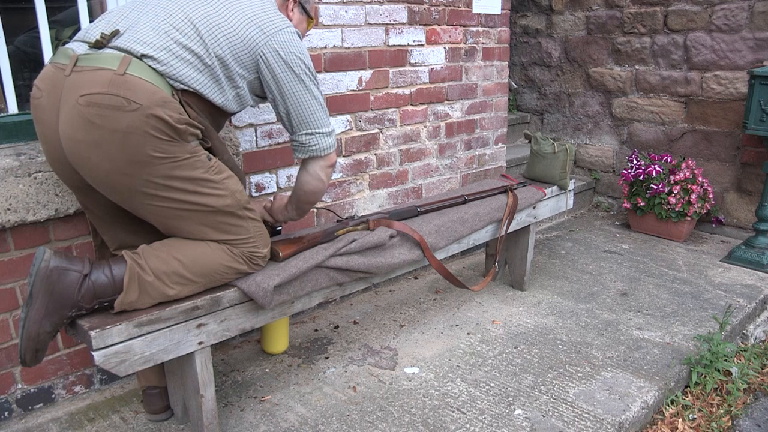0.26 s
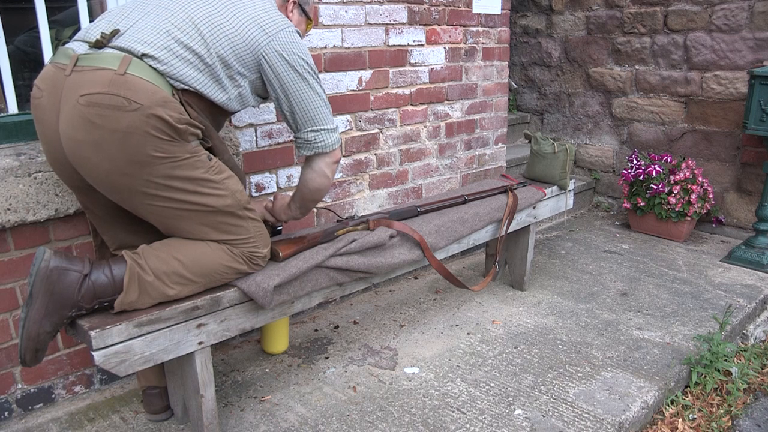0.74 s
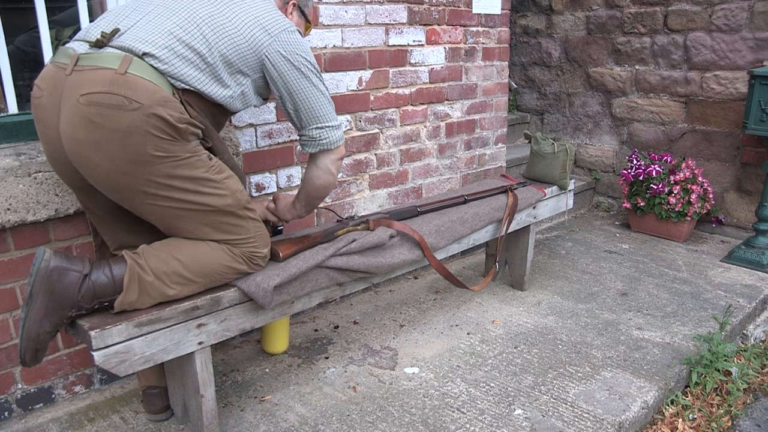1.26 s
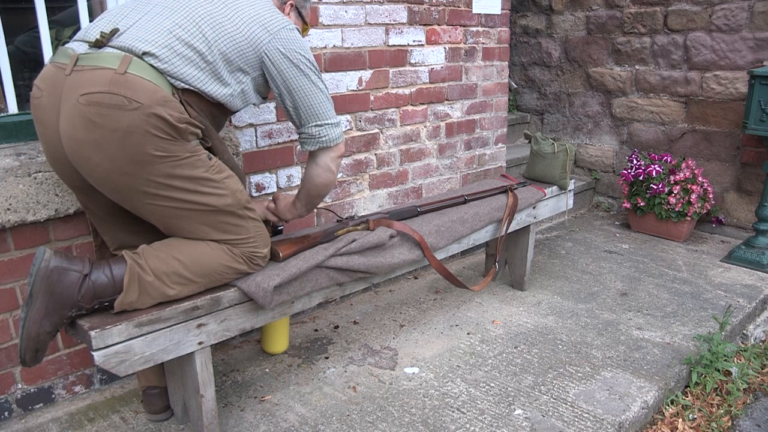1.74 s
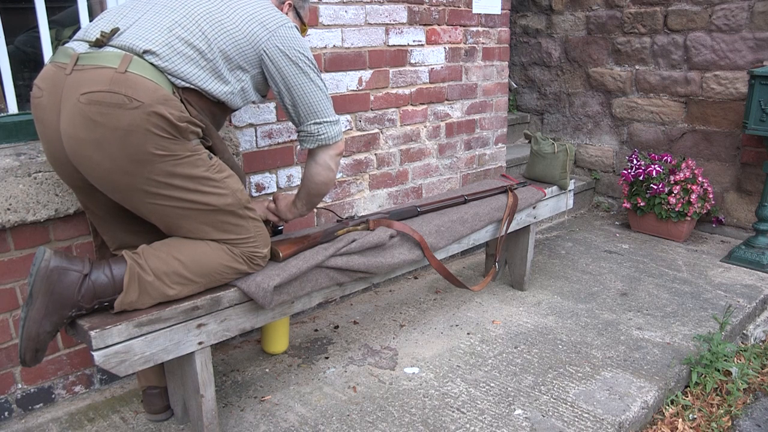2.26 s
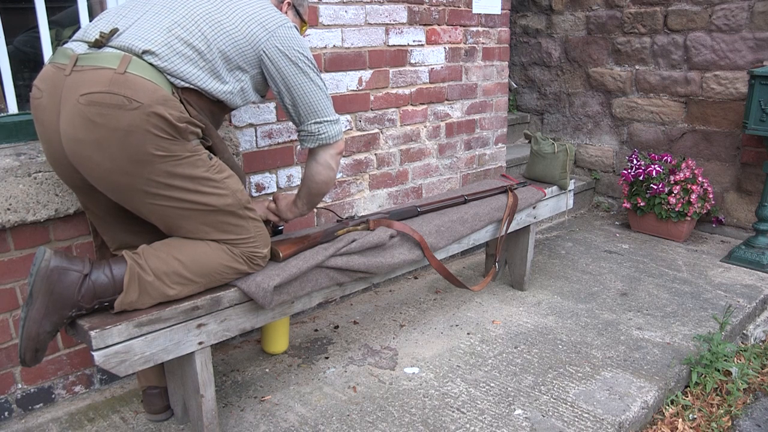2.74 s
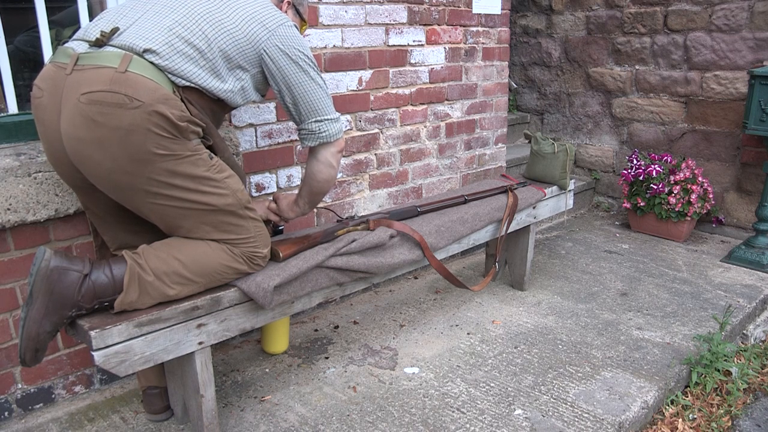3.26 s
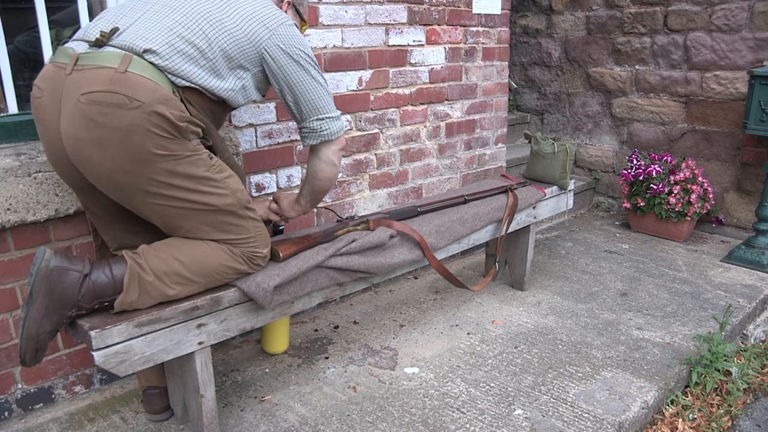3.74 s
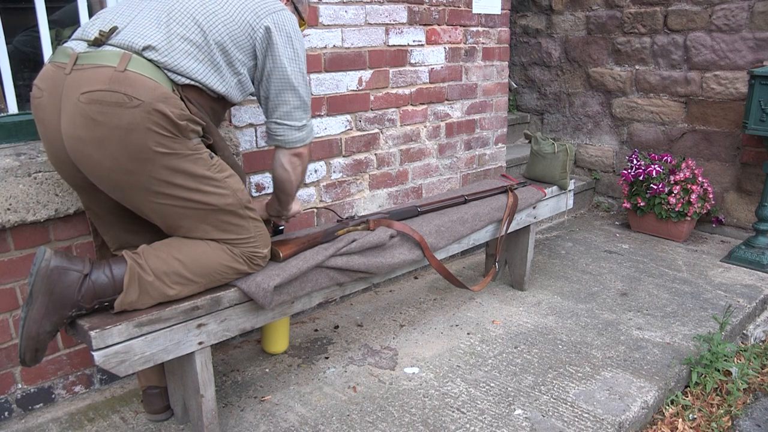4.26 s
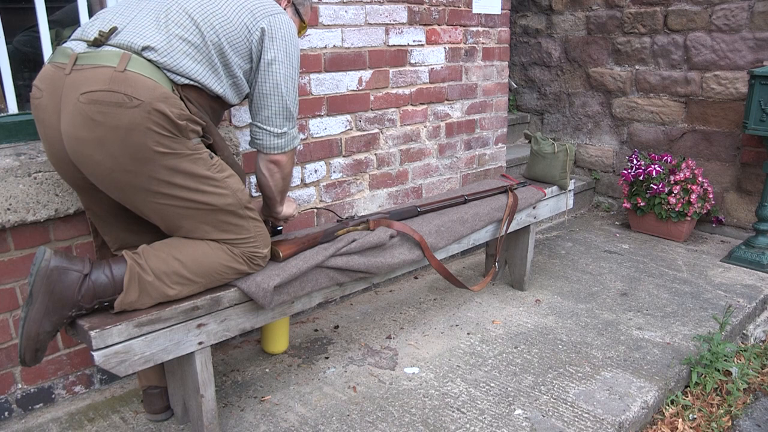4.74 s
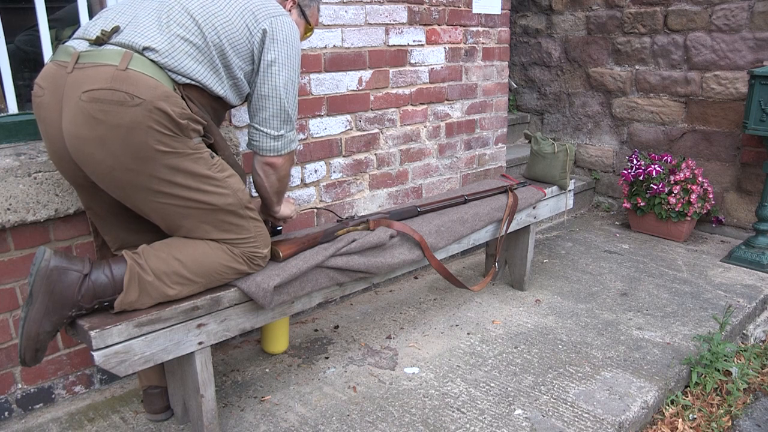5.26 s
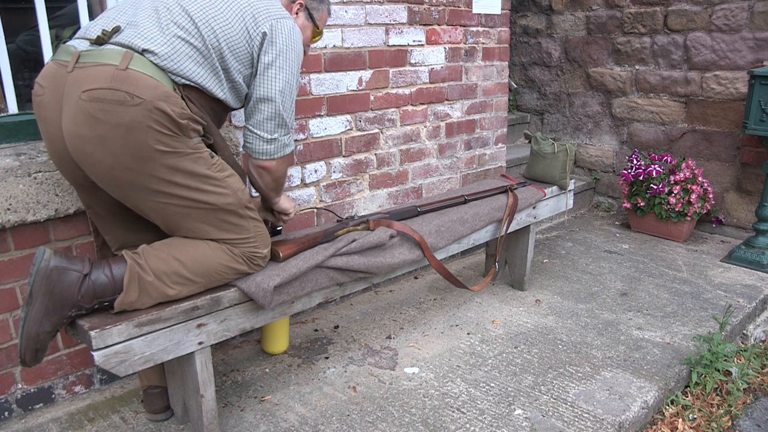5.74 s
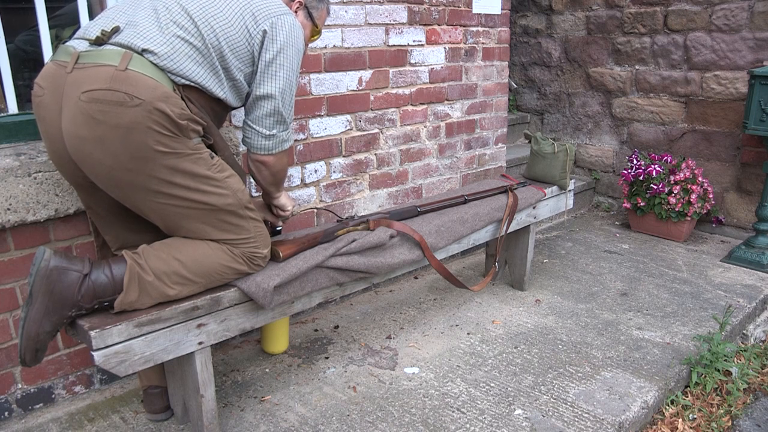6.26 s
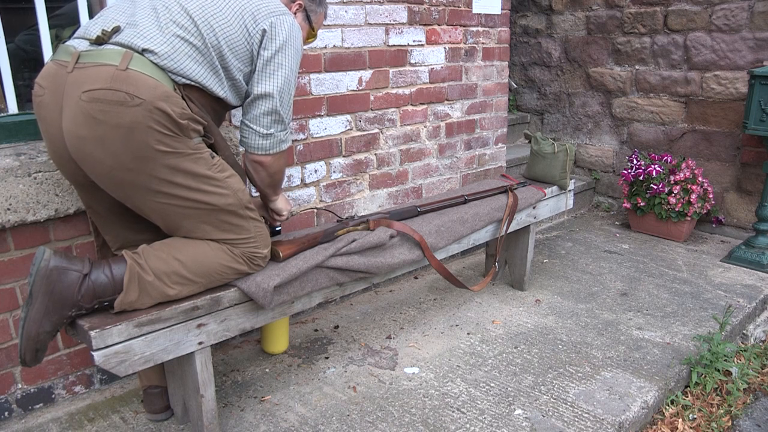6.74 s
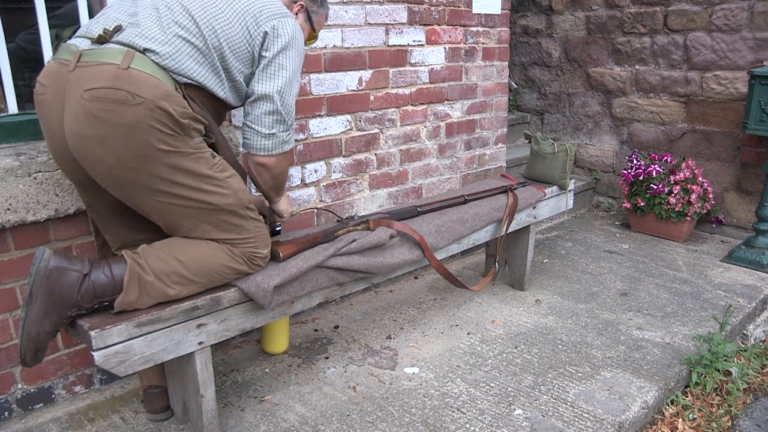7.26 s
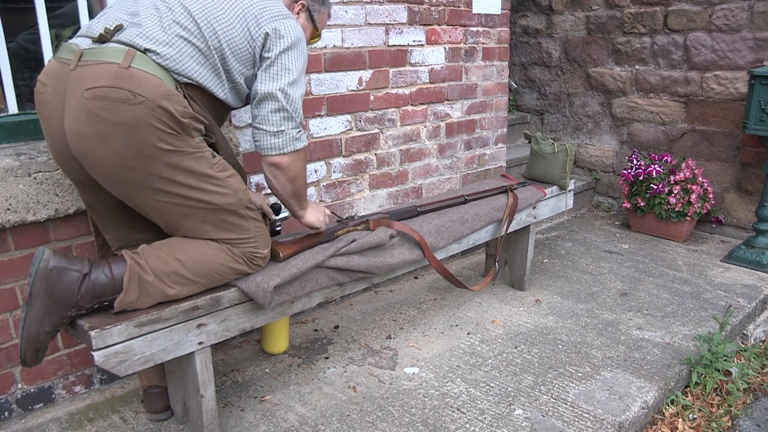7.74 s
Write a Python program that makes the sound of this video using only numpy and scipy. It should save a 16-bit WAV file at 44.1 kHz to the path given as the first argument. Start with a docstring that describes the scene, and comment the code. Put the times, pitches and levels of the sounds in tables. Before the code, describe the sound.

A quiet outdoor yard: soft far traffic drone, low engines fading away, and faint short bird chirps during the first 1.3 s. A small dry click comes at 0.75 s. From about 1.2 s a very thin air hiss appears with barely audible whistles, swelling by 2 s, with a soft low puff near 1.6 s. At 2.45-2.8 s it spits in quick spurts, with very sharp metallic clicks and a brief falling whistle. The hiss holds modestly, with light knocks at 3.3 and 3.5 s. At 3.6 s a click and high chirp-like whistle make it jump; a ringing clack at 3.83 s opens it wider, loudest and brightest around 4.1 s with a low roar beneath. After 4.5 s it drains steadily, a broad peak sliding downward around 6 s, fading to a faint hiss by 8 s as distant engines hum. Close, lightly reflective stereo.

```python
"""Compressed air hisses from a brass fitting on a wooden bench by a brick wall: shaped noise with a moving peak.
The hiss jumps and whistles (gliding tones) as a hand turns the fitting, then fades as the pressure drains.
Metal parts click: sharp noise blows that ring a set of decaying modes.
A bird chirps in short glides, engines pass in the distance as low wavering tones,
and far traffic drones and rushes as filtered noise."""
import sys
import numpy as np
from scipy import signal
from scipy.fft import rfft, irfft, next_fast_len
from scipy.io import wavfile
from scipy.ndimage import uniform_filter1d, map_coordinates

SR = 44100
rng = np.random.default_rng(int(sys.argv[2]) if len(sys.argv) > 2 else 0)


def generate_wav(sig):
    """Save sig (samples, or channels by samples) to the path in sys.argv[1] as 16-bit PCM at SR."""
    pcm = np.round(np.clip(np.atleast_2d(sig).T, -1, 1) * 32767).astype(np.int16)
    wavfile.write(sys.argv[1], SR, pcm)


N = 352359


def amp(db):
    """Decibels to linear gain."""
    return 10 ** (np.asarray(db) / 20)


def unit(x):
    """Scale to rms 1."""
    return x / np.sqrt(np.mean(x ** 2) + 1e-20)


def along(points, hz):
    """Read a curve of (Hz, value) points on a log frequency axis."""
    f, v = np.transpose(points)
    return np.interp(np.log(hz + 1), np.log(f + 1), v)


def curves(rows):
    """One value per sample for each column after the time."""
    s, *cols = np.transpose(rows)
    return [np.interp(np.arange(N) / SR, s, c) for c in cols]


def wobble(rate, count=N):
    """A smooth random curve with `rate` knots a second."""
    knots = rng.standard_normal(int(count * rate / SR) + 4)
    return map_coordinates(knots, [np.arange(count) * rate / SR])


def filtered(x, response):
    """Multiply the spectrum of x by a complex response of frequency."""
    m = next_fast_len(N + 8192)
    return irfft(rfft(x, m) * response(np.fft.rfftfreq(m, 1 / SR)), m)[..., :N]


def rush(spectrum, alike, patchy_db):
    """Stereo noise of rms 1: random patches in time and pitch, a set colour and left-right likeness."""
    z = signal.stft(rng.standard_normal((2, N)), nperseg=512)[2]
    field = uniform_filter1d(rng.standard_normal(z.shape[1:]), size=5, axis=0)  # over frequency
    field = uniform_filter1d(field, size=20, axis=1)  # over time
    pair = signal.istft(z * amp(patchy_db * unit(field)), nperseg=512)[1][:, :N]
    bounded = [(8.9, -120)] + spectrum + [(21000, -120)]

    def mid_side(hz):
        turn = np.arccos(np.clip(along(alike, hz), -1, 1)) / 2  # share of side that gives the likeness
        return amp(along(bounded, hz)) * [np.cos(turn), np.sin(turn)]

    mid, side = filtered(pair, mid_side)
    return unit(np.array([mid + side, mid - side]))


def scatter(t60, start, count):
    """Dense decaying echoes of energy 1 that swell in over `start` seconds."""
    t = np.arange(SR // 4) / SR
    tail = rng.standard_normal((count, len(t))) * amp(-60 * t / t60) * np.clip(t / start, 0, 1)
    return tail / np.linalg.norm(tail, axis=1, keepdims=True)


def glides(rows, waver, flutter_db, rate, overtone_db, edge_s, fade_db):
    """Short gliding tones, unsteady in pitch and level, soft-edged, with an octave stronger on high tones."""
    out = np.zeros(N)
    for s, length, from_hz, to_hz, bend, db in rows:
        i = np.arange(round(s * SR), round((s + length) * SR))
        left = np.linspace(1, 0, len(i))  # share of the tone still to come
        pitch = to_hz + (from_hz - to_hz) * left ** bend
        pitch = pitch * (1 + waver * wobble(rate, count=len(i)))
        phase = 2 * np.pi * np.cumsum(pitch) / SR
        level = amp(db + fade_db * (left - 1.0) + flutter_db * wobble(rate, count=len(i)))
        level = level * signal.windows.tukey(len(i), min(2 * edge_s / length, 1))
        octave = amp(overtone_db + 20 * np.log10(pitch / 7500)) * (pitch < SR / 4)  # none past Nyquist
        out[i] += np.sqrt(2) * level * (np.sin(phase) + octave * np.sin(2 * phase))
    return out


# Steady flow through the gap. Each row: time in seconds, fizz in dB, upper body in dB over the fizz,
# lower body in dB over the fizz.
FLOW = [(.9, -100, 12, 7), (1.17, -82, 8, 4), (1.22, -61.5, -2.5, -6), (1.54, -52, -4, -7.5),
        (1.6, -48.5, -5.5, -7), (1.93, -41.5, -5.5, -8), (2.44, -39.5, -5, -9), (3, -40.5, -5.5, -6),
        (3.595, -34, -5.5, -4.5), (3.605, -30.5, -4, -8.5), (3.82, -30, -3.5, -7.5),
        (3.84, -26, -4.5, -10.5), (4.04, -26, -5, -10), (4.115, -23.5, -6, -9.5), (4.45, -29.5, -6.5, -9.5),
        (5.4, -38.5, -6, -11), (6, -42, -6, -12.5), (6.7, -47, -4, -14.5), (7.99, -56, -6, -11)]
# Colours of the jet's fine fizz, upper body and lower body, and of its low roar.
# Each row: frequency in Hz, relative density in dB per Hz.
FIZZ_COLOUR = [(6500, -40), (8600, -6), (9800, -1), (10500, -3), (12500, -4), (13200, -8), (13700, -1),
               (14300, 1), (14900, -1), (15300, 0), (16500, -1)]
UPPER_COLOUR = [(2600, 0.5), (3800, -2.5), (5000, 0.5), (7800, -2.5), (9500, -37)]
LOWER_COLOUR = [(700, -4.5), (1200, -4.5), (2300, 1), (3300, -1.5), (4600, -10.5)]
ROAR_COLOUR = [(60, -40), (110, -12), (170, -5.5), (250, 1.5), (330, 0), (400, -4), (470, 0.5), (650, -7),
               (950, -12.5), (1500, -64)]
# Colour of the way from bench to microphone. Each row: frequency in Hz, gain in dB.
BENCH_TO_MIC = [(1000, -5), (1550, 0.5), (1900, -6.5), (2300, -2.5), (2800, -4.5), (3900, 0.5), (4900, 5.5),
                (5600, 3), (7200, 5.5), (8100, 3), (8800, -2.5)]
# Stereo width of hiss and roar. Each row: frequency in Hz, left-right likeness (1 = identical).
HISS_ALIKE = [(60, .94), (160, .85), (450, .82), (740, 0.87), (1220, .86), (2200, 0.99), (3300, 0.99),
              (5000, 0.79), (9000, 0.82), (15000, 0.74)]
ROAR_ALIKE = [(100, 0.97), (300, 0.96), (800, .85)]
# The roar swells while the gap stands wide.
# Each row: start in seconds, extra level in dB, rise in seconds, hold in seconds, fall in seconds.
WIDE_GAP = [(1.552, 19, 0.12, 0.07, 0.23), (3.82, 9.5, .06, 1.16, 0.61)]
ROAR_DB = -27  # low roar over fizz, before the swells
SPURT_UPPER_DB, SPURT_LOWER_DB = -8.5, -13  # bodies of a spurt over its fizz


def leak():
    """Turbulent jet: fine eddies fizz, larger ones give body and a low roar."""
    fizz_db, upper_db, lower_db = curves(FLOW)
    spurt = spurts()

    def level(steady_db, spurt_db):
        """Steady flow and spurts add as power."""
        return np.sqrt(amp(2 * (fizz_db + steady_db)) + amp(2 * spurt_db) * spurt)

    def part(spectrum):
        noise = rush(spectrum, HISS_ALIKE, patchy_db=0.73)
        return unit(filtered(noise, lambda hz: amp(along(BENCH_TO_MIC, hz))))

    jet = level(0, 0) * part(FIZZ_COLOUR)
    jet = jet + level(upper_db, SPURT_UPPER_DB) * part(UPPER_COLOUR)
    jet = jet + level(lower_db, SPURT_LOWER_DB) * part(LOWER_COLOUR)
    hz, t, z = signal.stft(jet, SR, nperseg=512)
    jet = signal.istft(z * jet_peak(hz, t), SR, nperseg=512)[1][:, :N]

    wide_db = sum(np.interp(np.arange(N) / SR, np.cumsum([s, rise, hold, fall]), [0, db, db, 0])
                  for s, db, rise, hold, fall in WIDE_GAP)
    roar = level(0, 0) * amp(ROAR_DB + wide_db) * rush(ROAR_COLOUR, ROAR_ALIKE, patchy_db=0.0)
    hiss = amp(0.25 * wobble(25)) * jet + roar
    return ridged(hiss, still_db=-15.5, hand_db=-10)


# Spurts as the fitting slips in the hand.
# Each row: start in seconds, fizz in dB, rise in seconds, hold in seconds.
SLIPS = [(2.456, -30.5, 0.03, .005), (2.535, -33, .03, 0.038), (2.672, -26.5, .003, .002)]
SPURT_FALL_DB_PER_S = 132


def spurts():
    """Power of the spurts: each rises, holds, then falls at a steady rate in dB."""
    t = np.arange(N) / SR
    power = np.zeros(N)
    for s, db, rise, hold in SLIPS:
        falling_s = np.maximum(t - s - rise - hold, 0)
        power += (np.clip((t - s) / rise, 0, 1) * amp(db - SPURT_FALL_DB_PER_S * falling_s)) ** 2
    return power


# A broad peak (or slight dip) in the jet noise sits where the grip puts it.
# Each row: start in seconds, centre in Hz, width in Hz, boost in dB.
PEAK_STAYS = [(0, 4250, 900, 2.5), (2.45, 12200, 1100, 3), (3.6, 6200, 1300, -0.6), (4.4, 9000, 800, 2.5)]
# Then it slides down an S-shaped path as the pressure drains.
SLIDE_FROM_S, SLIDE_MIDDLE_S, SLIDE_PACE_S = 5.2, 6.17, 0.3
SLIDE_TOP_HZ, SLIDE_END_HZ, SLIDE_WIDTH_HZ, SLIDE_DB = 16600, 3600, 510, 3.9


def jet_peak(hz, t):
    """Gain of the jet's broad peak over frequency and time: stepped by the grip, then sliding down."""
    s, *cols = np.transpose(PEAK_STAYS)
    row = np.searchsorted(s, t, side="right") - 1
    centre_hz, width_hz, boost_db = (c[row] for c in cols)
    fall = 1 / (1 + np.exp((t - SLIDE_MIDDLE_S) / SLIDE_PACE_S))
    slide_hz = SLIDE_END_HZ + (SLIDE_TOP_HZ - SLIDE_END_HZ) * fall
    late = t > SLIDE_FROM_S
    centre_hz = np.where(late, slide_hz, centre_hz)
    width_hz = np.where(late, SLIDE_WIDTH_HZ, width_hz)
    boost_db = np.where(late, SLIDE_DB, boost_db)
    return amp(boost_db * np.exp(-.5 * ((hz[:, None] - centre_hz) / width_hz) ** 2))


# The hand shifts on the fitting. Each entry: start of a grip in seconds.
GRIP_STARTS = [0, 2.45, 3.6, 4.4, 5.6, 6.8]


def ridged(x, still_db, hand_db):
    """Bench and wall scatter sound in a fixed way, the hand anew with each grip: fine ridges in the colour."""
    still = amp(still_db) * scatter(0.076, 0.001, count=1)
    hand = amp(hand_db) * scatter(0.045, 0.0018, count=len(GRIP_STARTS))
    grip = np.searchsorted(GRIP_STARTS, np.arange(N) / SR, side="right") - 1
    out = x + signal.fftconvolve(x, still, axes=1)[:, :N]
    for k, tail in enumerate(hand):
        share = uniform_filter1d((grip == k) * 1., size=4000)  # crossfade from grip to grip
        held = x * np.sqrt(np.abs(share))
        out = out + signal.oaconvolve(held, tail[None], axes=1)[:, :N]
    return out / np.sqrt(1 + amp(2 * still_db) + amp(2 * hand_db))  # keep the power


# Whistles of the narrowed gap; the row at 2.772 is the faint ringing-on of the one before.
# Each row: start in seconds, length in seconds, first pitch in Hz, last pitch in Hz,
# bend (1 = straight), level in dB before flutter.
GAP_TONES = [(1.243, .036, 9600, 9600, 1, -61), (1.235, .1, 2930, 2930, 1, -67),
             (1.37, .1, 2945, 2930, 1, -62.5), (2.526, 0.048, 4920, 4270, 2, -39.5),
             (2.722, 0.049, 8860, 7450, 2.05, -27), (2.772, .06, 7570, 7700, 1, -57),
             (3.598, .024, 10000, 10200, 1, -25), (3.603, .047, 10900, 12050, 1.2, -27.5),
             (3.96, .03, 11750, 11550, 1, -32), (4.128, 0.046, 7000, 6000, 1.5, -33),
             (4.21, 0.053, 1553, 1555, 1.1, -34.5), (4.45, .065, 8350, 8600, .6, -44),
             (4.51, 0.11, 9000, 9300, 1, -38)]


def whistles():
    """The narrowed gap sings in short, unsteady tones, one of them ringing on faintly."""
    return glides(GAP_TONES, waver=.014, flutter_db=3.5, rate=600, overtone_db=-8, edge_s=.012, fade_db=0)


# Contacts of hand, fitting and bench. Each row: time in seconds, level in dB, centre of the blow in Hz,
# breadth in octaves, rattle t60 in seconds.
CONTACTS = [(0.742, -35.5, 5000, 1.1, 0.0046), (.745, -37, 7000, 1.5, .008), (.7555, -52, 9000, 1.0, .006),
            (1.5648, -41, 1700, .2, .008), (1.5655, -43, 880, .15, .006), (1.575, -52, 850, .2, .006),
            (1.595, -46, 3550, 1.2, .022), (2.459, -28.5, 3500, 1.1, .02), (2.676, -12, 5030, 0.7, .004),
            (2.6773, -6, 11000, .53, .006), (2.717, -20.5, 3500, 1.1, .015), (2.719, -27, 600, 0.8, .015),
            (2.7533, -17, 4400, .6, 0.017), (2.783, -42, 700, .44, .018), (3.315, -34, 2500, 1.1, .023),
            (3.502, -22, 1700, 1.5, 0.016), (3.513, -26.5, 2000, 1.2, 0.027), (3.517, -26, 2220, .5, .03),
            (3.527, -33.5, 1900, 0.66, .027), (3.5977, -14, 3370, 0.37, 0.015),
            (3.6007, -19.5, 3020, 0.24, .032), (3.611, -29, 2770, .42, .023),
            (3.8278, -13, 3500, 0.53, .045), (3.832, -16, 3600, .55, 0.049), (3.843, -25, 2560, .3, .048)]
# Ring of fitting and bench. Each row: mode in Hz, relative level in dB, t60 in seconds.
MODES = [(400, -5, .025), (560, -3, .025), (700, -5, .025), (870, 0, .035), (1550, -2, .025),
         (1850, 0, .03), (2300, -1, .025), (2650, 0, .025), (3000, 0, .025), (3350, -2, .02),
         (3800, -4, .02), (4500, -5, .018), (5000, -8, .015), (9800, -8, .018)]
RING_DB, RING_DB_PER_OCTAVE = -6, -6  # ring line through 1 kHz; brighter blows ring less
RING_KNEE_HZ = 1500  # duller blows ring no more than here


def clicks():
    """Each contact is a sharp blow and a dying rattle, shaking the modes near its centre."""
    out, t = np.zeros(N + SR), np.arange(SR // 8) / SR
    hz, level, t60 = np.transpose(MODES)[:, :, None]
    grid = np.fft.rfftfreq(len(t), 1 / SR) + 1
    lead = 40  # samples of room before the blow for its filter to swell
    for s, db, centre_hz, octaves, rattle in CONTACTS:
        ring_db = RING_DB + RING_DB_PER_OCTAVE * np.log2(max(centre_hz, RING_KNEE_HZ) / 1000)
        near = lambda f: np.exp(-.5 * (np.log2(f / centre_hz) / octaves) ** 2)
        mode_level = amp(level + rng.normal(0, 1.0, hz.shape) - 60 * t / t60)
        ring = np.sum(near(hz) * mode_level * np.sin(2 * np.pi * hz * t), axis=0)
        shake = 0.15 * rng.standard_normal(len(t)) * amp(-60 * t / rattle)
        shake[0] = 1  # the blow itself
        shake = np.roll(shake, lead)
        crack = irfft(rfft(shake) * near(grid), len(t)) / np.mean(near(grid))
        rung = amp(ring_db) * np.convolve(shake, ring)[:len(t)]
        out[round(s * SR) - lead:][:len(t)] += amp(db) * (crack + rung)
    return filtered(out[:N], lambda f: (1j * f / (150 + 1j * f)) ** 2)  # small parts push no bass


# Bench, wall and ground answer.
# Each row: delay in seconds, left in dB, right in dB, both before the early_db trim.
REFLECTIONS = [(.0016, -12, -11), (.0025, -15, -18), (.0035, -23, -25), (.0058, -36, -32),
               (.0093, -10, -24), (.014, -16, -9)]


def nearby_walls(x, early_db, tail_db):
    """Direct sound plus early reflections, and a short scattered tail."""
    delay, left, right = np.transpose(REFLECTIONS)
    gains = amp(np.array([left, right]) + early_db)
    early = filtered(x, lambda hz: 1 + gains @ np.exp(-2j * np.pi * np.outer(delay, hz)))
    tail = signal.fftconvolve(x[None], scatter(0.23, 0.0059, count=2), axes=1)[:, :N]
    return early + amp(tail_db) * tail


# Chirps. Each row: start in seconds, length in seconds, first pitch in Hz, last pitch in Hz,
# bend (1 = straight), level in dB before fade and flutter.
CHIRPS = [(.083, 0.021, 2850, 4050, 1.3, -61), (.149, .022, 3400, 4900, 1, -65),
          (.42, 0.057, 3050, 4460, 0.84, -65.5), (.74, 0.17, 4740, 3150, 1.75, -64),
          (.908, .048, 3240, 3100, 1, -72), (.976, .028, 2800, 2550, 1, -69),
          (1.08, .021, 3200, 5200, .8, -67), (1.229, .026, 3500, 4800, 1.3, -59),
          (1.259, 0.02, 4200, 5100, 1, -61)]


def bird():
    """Short, nearly pure gliding chirps that weaken towards their ends."""
    return glides(CHIRPS, waver=.007, flutter_db=3, rate=300, overtone_db=-40, edge_s=.005, fade_db=4)


# Passing engines. Each list holds one engine's tones, except the second: a higher tone of the first engine. #
# Each row: time in seconds, firing tone in Hz, its level in dB, # rough level in dB at twice the tone, rough
# level in dB at three times the tone.
PASSING_ENGINES = [
    [(0, 77.1, -60, -75, -58), (.3, 67, -63, -75, -59.5), (.8, 58.9, -63, -79, -77),
     (1.3, 51.8, -68, -75, -80), (1.8, 45, -77, -70, -84)],
    [(0, 104.2, -53, -69, -82), (.4, 98.8, -58, -72, -80), (.8, 99, -76, -77, -78)],
    [(4.75, 53.4, -78, -78, -80), (5.0, 59, -56, -70, -73), (5.6, 58.3, -53.5, -70, -75),
     (6.0, 58.8, -57.5, -63, -75), (6.25, 62.5, -52.5, -78, -85), (6.6, 70.3, -59.5, -62.5, -77),
     (7.1, 70.5, -54.5, -63.5, -69), (7.4, 70.6, -64, -55.5, -59), (7.55, 71.7, -59, -65, -71),
     (7.7, 83, -62, -74, -74), (7.99, 83.6, -61, -72, -61)],
]


def engines():
    """Low firing tones of distant engines with rough multiples, wavering in the air."""
    out = np.zeros(N)
    t = np.arange(N) / SR
    for rows in PASSING_ENGINES:
        hz, *levels_db = curves(rows)
        fade_in = np.clip((t - rows[0][0] + 0.092) / .1, 0, 1)
        fade_out = np.clip((rows[-1][0] + .1 - t) / .1, 0, 1)
        phase = 2 * np.pi * np.cumsum(hz * (1 + 0.0084 * wobble(7.1))) / SR
        for multiple, db in enumerate(levels_db, start=1):
            level = np.sqrt(2) * amp(db + 0.62 * wobble(9.3))
            out += fade_in * fade_out * level * np.sin(multiple * phase)
    return out


# Far traffic. Each row: time in seconds, drone in dB, tyre rush in dB.
TRAFFIC_LEVELS = [(0, -50, -56), (.55, -55.5, -58), (1.5, -58, -58.5), (2.5, -57, -56), (3.8, -60.5, -55.5),
                  (4.5, -54.5, -63), (5.8, -59, -57), (6.7, -57, -57), (7.99, -55, -54.5)]
# Tyres of the nearest car. Each row: time in seconds, level in dB.
NEAR_CAR_LEVELS = [(0, -58), (.3, -60.5), (.6, -62.5), (.9, -67), (1.3, -75), (7, -88), (7.99, -78)]
# Colours of drone, far tyres and near tyres. Each row: frequency in Hz, relative density in dB per Hz.
DRONE_COLOUR = [(20, -28), (45, -5.5), (100, -0.5), (140, -5), (210, -2.5), (320, -7.5), (500, -26)]
RUSH_COLOUR = [(150, -40), (260, -18.5), (380, -5), (550, -5.5), (800, -6), (1150, -11.5), (1600, -13),
               (2200, -17), (3500, -21), (6000, -29), (10000, -32.5), (16000, -37)]
TYRE_COLOUR = [(500, -30), (850, -6), (1150, 6), (1450, -3), (2200, -28)]
# Stereo width of the traffic. Each row: frequency in Hz, left-right likeness (1 = identical).
FAR_ALIKE = [(60, 0.94), (130, 0.86), (290, 0.59), (640, 0.43), (1410, 0.24), (3100, 0.093), (6820, 0.02),
             (15000, 0.04)]


def traffic():
    """Filtered noise: a low drone, the rush of far tyres and the brighter tyres of the nearest car."""
    drone_db, rush_db = curves(TRAFFIC_LEVELS)
    drone = amp(drone_db + .7 * wobble(5)) * rush(DRONE_COLOUR, FAR_ALIKE, patchy_db=1.5)
    car = amp(curves(NEAR_CAR_LEVELS)[0]) * rush(TYRE_COLOUR, FAR_ALIKE, patchy_db=1.0)
    far_tyres = amp(rush_db) * rush(RUSH_COLOUR, FAR_ALIKE, patchy_db=1.16)
    return drone + car + far_tyres


def scene():
    """Bench in front, bird off to the right, traffic and engines behind; [left, right] trims in dB."""
    bench = leak() + nearby_walls(whistles() + clicks(), early_db=-2.5, tail_db=-8.0)
    far_bird = nearby_walls(bird(), early_db=-4, tail_db=-6)
    far_bird[0] = np.roll(far_bird[0], 2)  # reaches the left two samples later
    low = (engines() + traffic()) * amp([[-.6], [.6]])
    return bench * amp([[-.15], [.15]]) + far_bird * amp([[-1.5], [1.5]]) + low


TOP_HZ = 15770


def record(dry):
    """The microphone channel keeps nothing above its band limit."""
    return filtered(dry, lambda hz: hz < TOP_HZ)


dry = scene()
out = record(dry)
generate_wav(out)
```